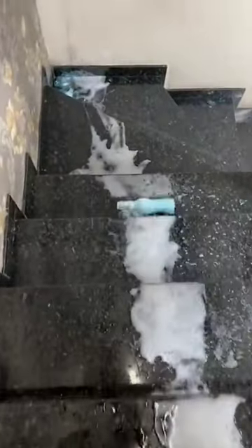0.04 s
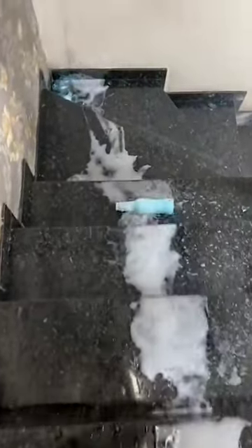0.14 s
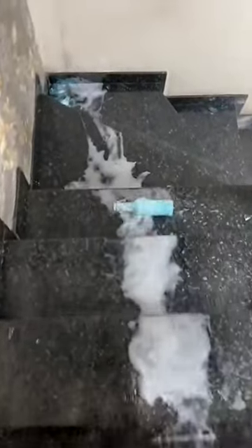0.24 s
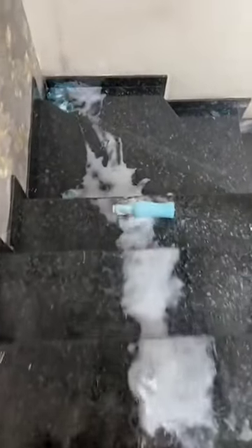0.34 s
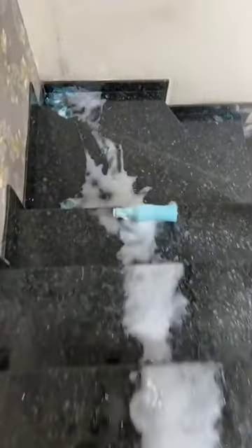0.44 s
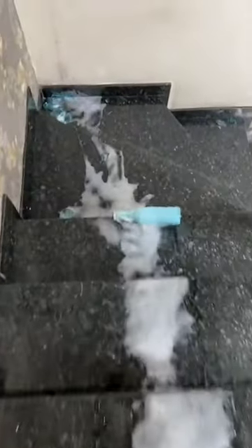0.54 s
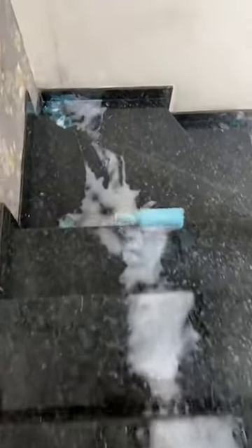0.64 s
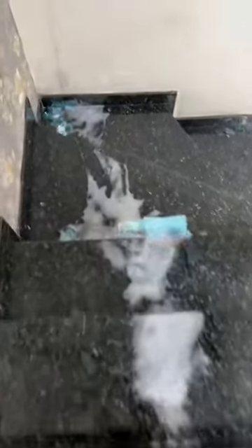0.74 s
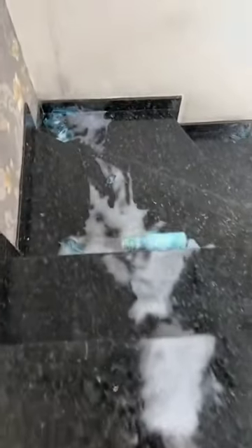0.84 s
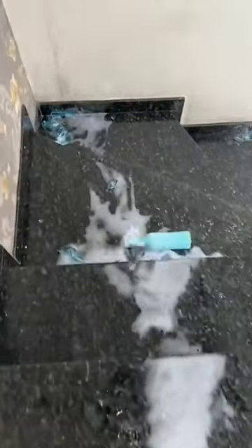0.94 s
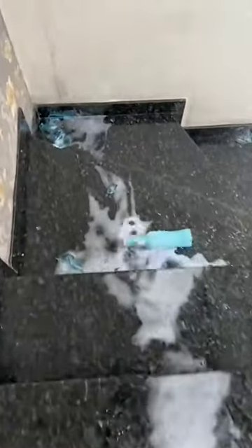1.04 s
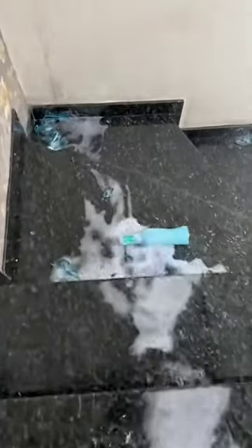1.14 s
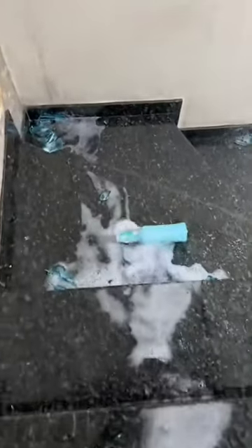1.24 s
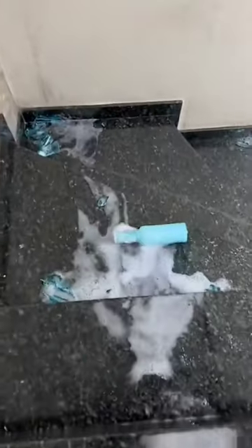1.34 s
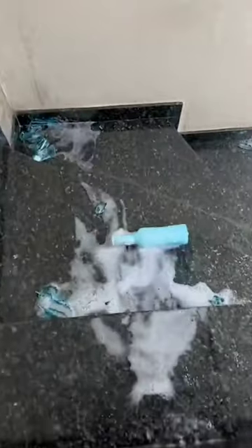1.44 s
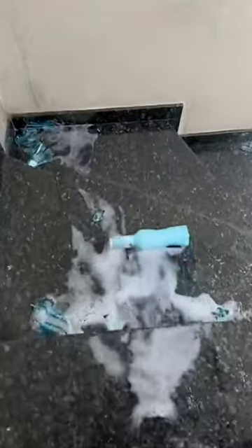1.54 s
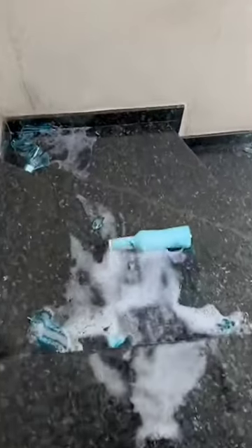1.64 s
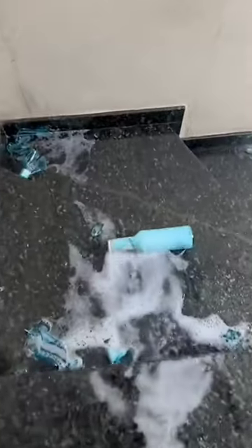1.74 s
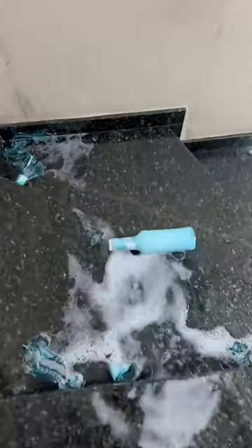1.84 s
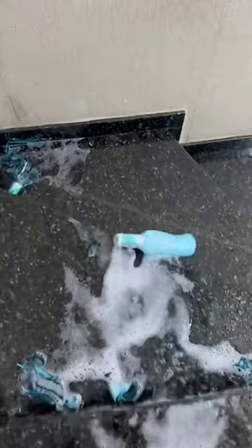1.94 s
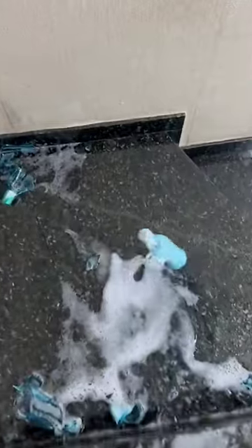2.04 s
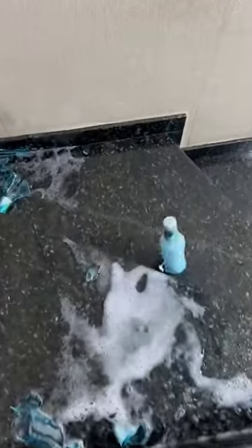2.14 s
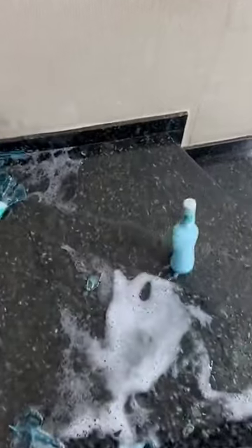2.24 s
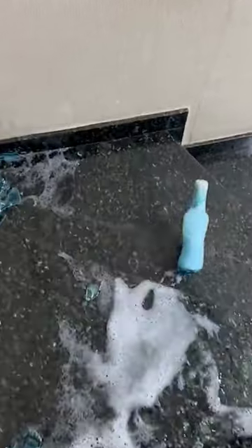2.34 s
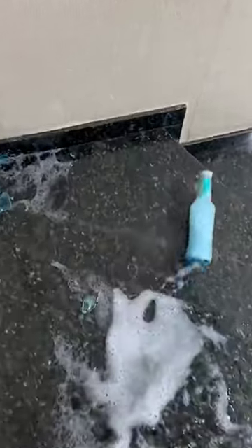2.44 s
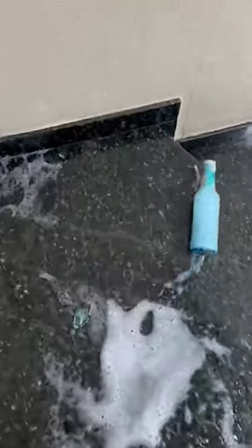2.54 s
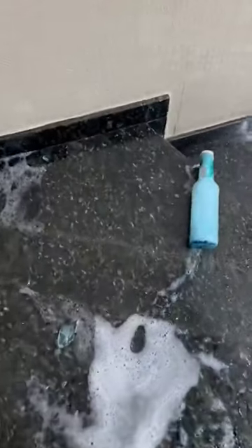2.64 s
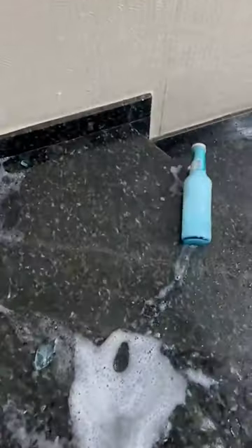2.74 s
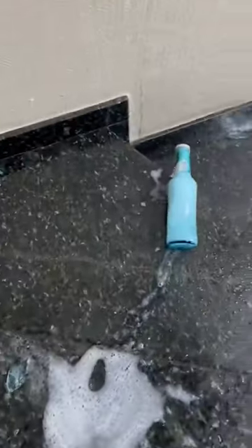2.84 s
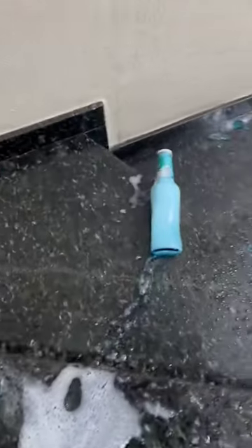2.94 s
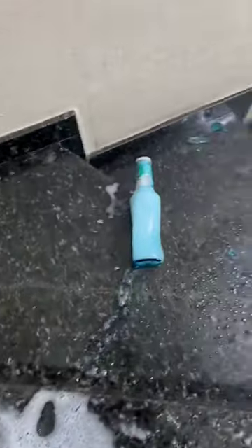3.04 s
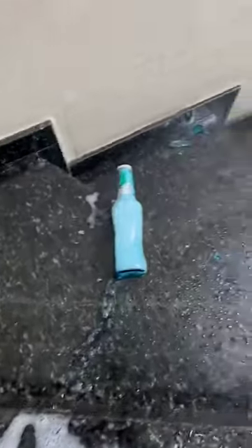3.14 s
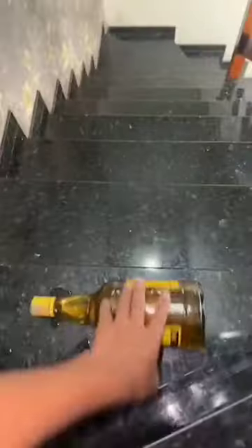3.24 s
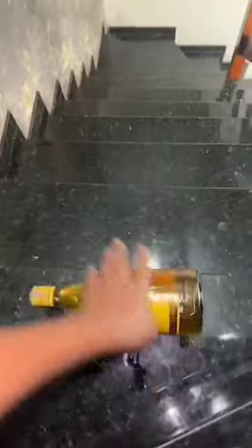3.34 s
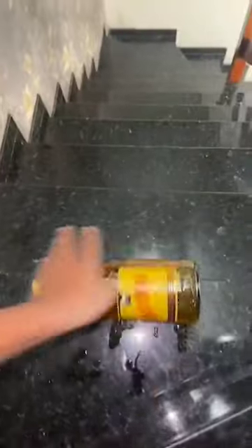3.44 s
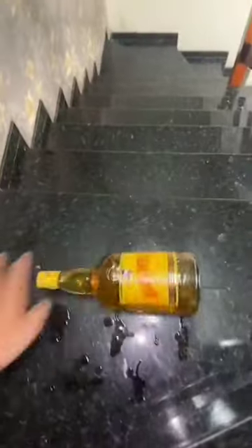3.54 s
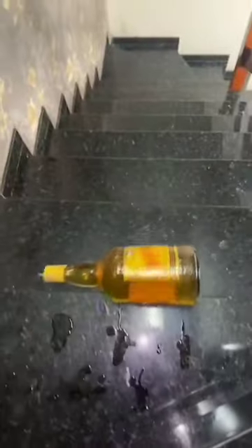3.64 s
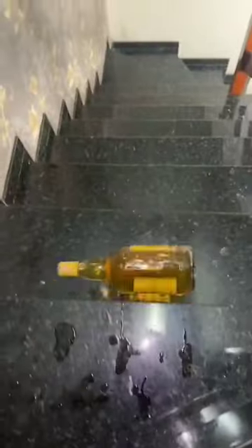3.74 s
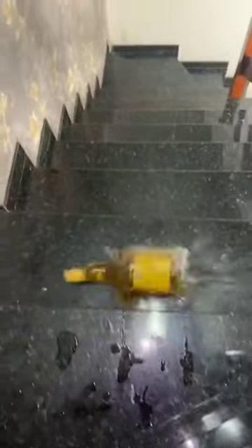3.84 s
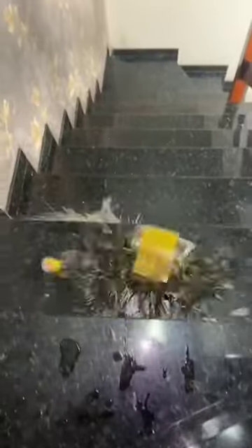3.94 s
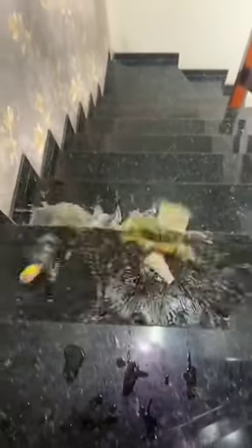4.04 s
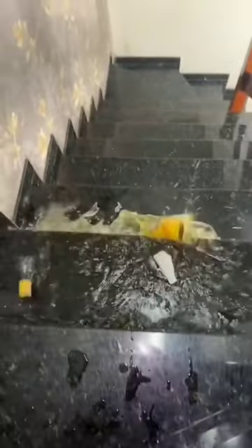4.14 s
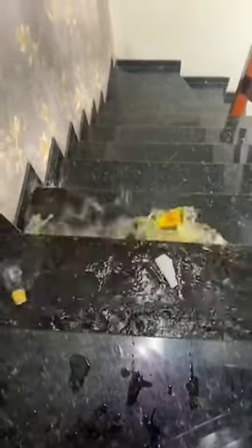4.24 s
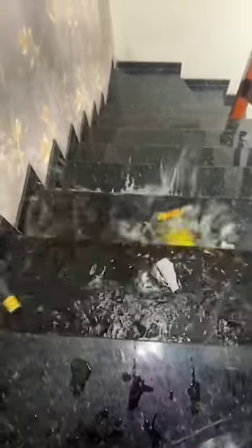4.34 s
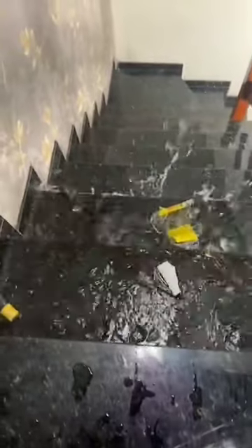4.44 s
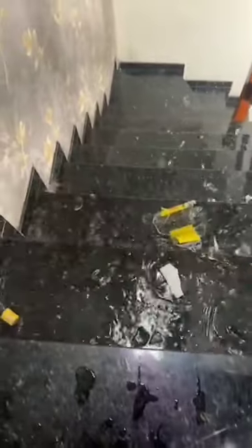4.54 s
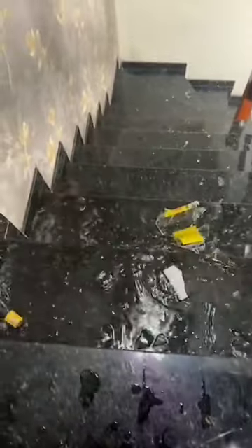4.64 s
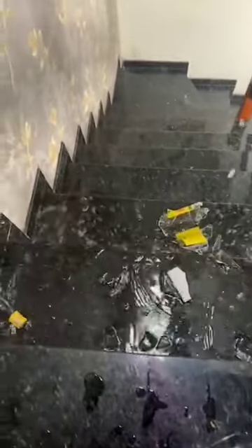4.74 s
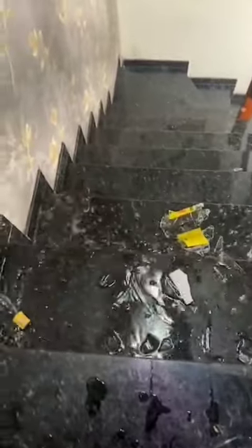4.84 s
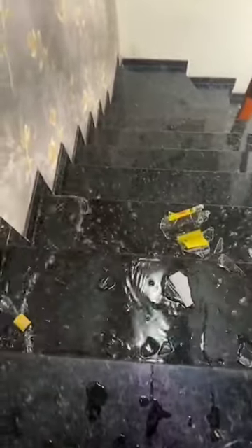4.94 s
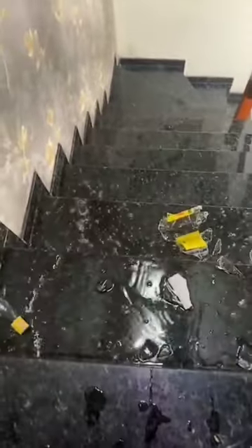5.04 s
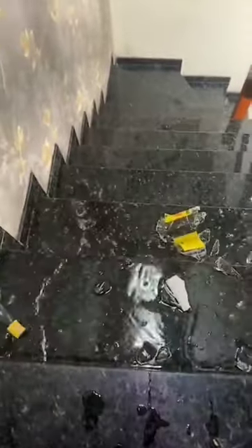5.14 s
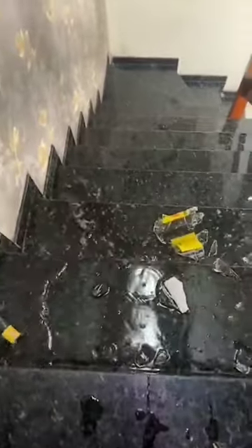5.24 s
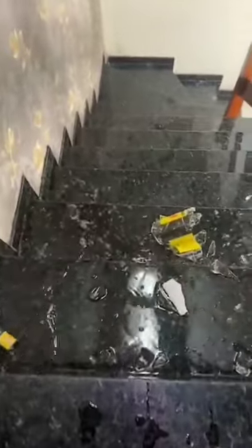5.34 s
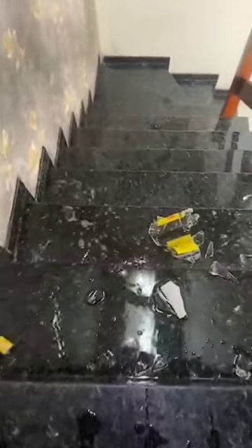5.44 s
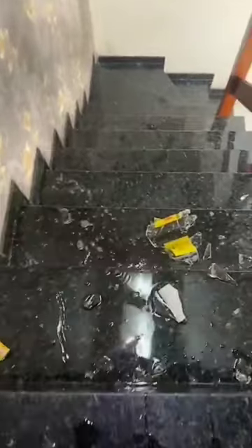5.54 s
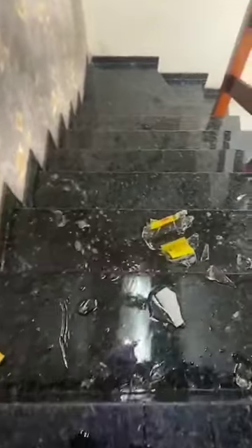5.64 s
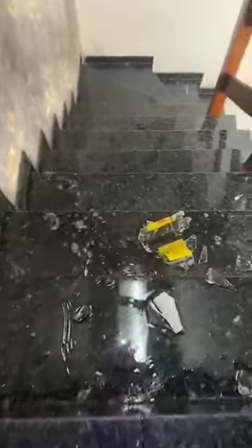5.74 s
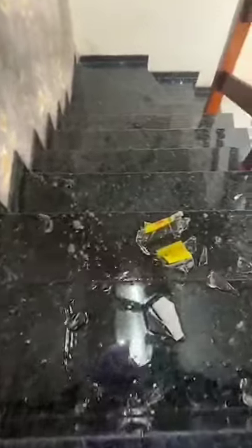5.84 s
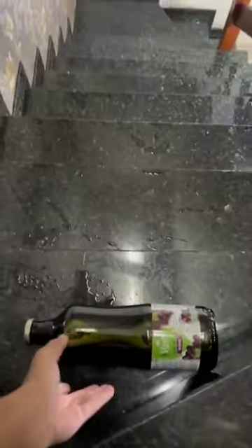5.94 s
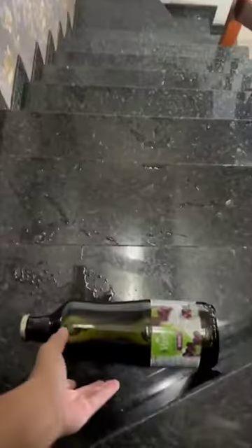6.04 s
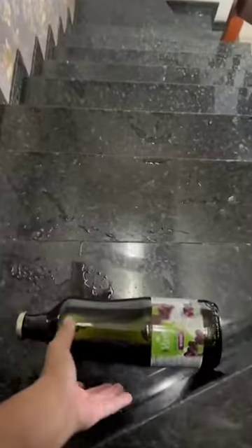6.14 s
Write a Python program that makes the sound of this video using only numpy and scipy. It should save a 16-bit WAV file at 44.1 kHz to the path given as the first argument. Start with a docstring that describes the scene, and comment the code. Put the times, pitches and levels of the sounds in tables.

```python
"""Bottles down a stairwell

Place: granite steps in a hard, echoing stairwell. Microphone: a phone above the bottles, in stereo.
A small full bottle knocks from step to step unbroken: short clacks, damped wall modes and thuds.
A big one is set down, rolls off the edge and bursts: ringing modes, showers of clicks, filtered spatter.
A third bottle starts to roll: uneven low noise with dull bumps. Shaped noise gives the echo and the air.
"""
import sys
import numpy as np
from scipy import signal
from scipy.fft import rfft, irfft
from scipy.io import wavfile
from scipy.ndimage import uniform_filter1d, minimum_filter1d

SR = 44100
rng = np.random.default_rng(int(sys.argv[2]) if len(sys.argv) > 2 else 0)


def dump(signal):
    """Clip the signal to [-1, 1] and save it as 16-bit WAV at the path in sys.argv[1]."""
    limited = np.clip(np.atleast_2d(signal).T, -1, 1)
    pcm = np.round(limited * 32767).astype(np.int16)
    wavfile.write(sys.argv[1], SR, pcm)


N = 272979
TIME = np.arange(N) / SR  # the whole take, s
HIT_TIME = np.arange(SR * 3 // 5) / SR  # one hit, s

# All event and mode levels are relative; scene() sets the balance between the sources. # background air, which
# shifts abruptly at these times: [from t/s, level/dB, side level/dB, high edge f/Hz]
PLACES = [(0, -59.5, -71, 14000), (2.3, -63, -71, 10000), (3.22, -63.5, -100, 6000),
          (5.96, -61.5, -65.5, 16000)]
# colour of the air in the middle, and at the sides: [f/Hz, level/dB]
AIR_COLOUR = [(25, -11.5), (60, 9), (100, -2.5), (200, -5.5), (500, -11), (1000, -9), (2000, -11.5),
              (4000, -10), (8000, -11.5), (10000, -11.5), (11500, -41.5), (16000, -50.5)]
AIR_SIDE_COLOUR = [(100, -23), (450, 3), (1000, -3), (1800, -10), (3000, -2), (6000, -2.5), (10000, -6.5),
                   (12000, -29)]
# how long the stairwell echoes: [f/Hz, t60/s]
STAIRWELL_T60 = [(150, 1.0), (400, 0.89), (1000, 0.63), (2800, 0.53), (7000, 0.48), (14000, 0.39)]
# single early reflections from the walls: [delay t/s, level/dB]
WALL_ECHOES = [(.0072, -15.5), (0.012, -15.5), (0.0239, -13.5)]
# colour of the small bottle's echo at the sides: [f/Hz, side level/dB]
ECHO_WIDTH = [(100, -25.5), (300, -19), (900, -13), (1800, -22.5), (2600, -6), (4500, -4), (7500, -10),
              (12000, -9.5)]
# the echo weakens as the phone catches up with the small bottle: [t/s, echo level/dB]
KNOCK_ECHO = [(0, -2), (2.42, -2.5), (2.57, -8), (3.23, -14)]

# the spilled drink foams: [start t/s, level/dB, attack t/s, hold t/s, fade/(dB per s)]
FOAM_FADE = (4.6, -67.5, 0.1, 0.7, 35)
# colour of the foam: [f/Hz, level/dB]
FOAM_COLOUR = [(1000, -20), (4000, -6), (10000, 1), (15500, -2)]
# a palm slides off the glass: [start t/s, level/dB, attack t/s, hold t/s, fade/(dB per s)]
HAND_FADE = (3.5, -48.5, 0.02, 0.01, 136)
# colour of skin on glass: [f/Hz, level/dB]
HAND_COLOUR = [(300, -25), (2000, -4), (5000, 1.5), (9000, -4.5), (15000, -7)]
# the big and the third bottle roll: [start t/s, level/dB, attack t/s, hold t/s, fade/(dB per s)]
BIG_ROLL_FADE = (3.5, -43, 0.045, 0.33, 72)
THIRD_ROLL_FADE = (5.96, -42.5, 0.004, -0.1, 23)
# colour of each roll: [f/Hz, level/dB]
BIG_ROLL_COLOUR = [(40, -14.5), (85, 6), (150, -14.5), (340, 7.5), (900, -1.5), (1400, -14.5),
                   (2100, -10.5), (3400, -25), (5000, -18), (7000, -38), (16000, -32.5)]
THIRD_ROLL_COLOUR = [(30, -11), (75, -2), (120, -2), (175, -44), (225, -4), (255, 5), (290, -10),
                     (360, -14), (700, -24.5), (3000, -26.5), (6500, -44.5), (9500, -31), (12500, -49)]
# the third bottle bumps on its seam as it rolls: [t/s, level/dB]
ROLL_BUMPS = [(5.969, -27), (6.009, -27), (6.085, -21), (6.156, -23)]
# modes of one bump: [f/Hz, level/dB, t60/s]
BUMP_MODES = [(74.5, 1, 0.091), (115, -3, .08), (240.5, 3, 0.13), (285, 0.5, 0.091)]

# the freed drink slaps down over trapped air, modes: [f/Hz, level/dB, t60/s]
AIR_POCKET = [(190, -4.5, .16), (223.6, -6, 0.4)]
# the drink lands, as a mass (low) or as fine drops (high): [t/s, level/dB, decay t/s, pitch f/Hz]
SPLASHES = [(3.819, -7.5, 0.082, 378), (4.183, -20, 0.013, 10000), (4.203, -16, 0.012, 10100),
            (4.285, -6, 0.027, 9000), (4.305, -8.5, 0.043, 822), (4.582, -16.5, 0.044, 7400),
            (4.68, -21.5, 0.082, 5400), (4.996, -23.5, 0.055, 5000), (5.06, -21, 0.033, 9200),
            (5.145, -30, 0.053, 7400), (5.205, -34, 0.03, 2600), (5.538, -17, 0.025, 7600)]
# showers of splinters: [t/s, level/dB, decay t/s]
SHOWERS = [(3.822, 6.5, 0.034), (3.872, -0.5, 0.05), (3.96, 1.5, 0.086), (4.219, -4, 0.15),
           (4.289, 2, 0.044), (4.39, -9.5, 0.035), (4.9, -36, 0.018), (5.42, -43, 0.04),
           (5.527, -23.5, 0.06), (5.768, -34, 0.031)]
# colour of breaking glass: [f/Hz, level/dB]
BREAKING_COLOUR = [(60, -11), (300, -1.5), (800, 5), (1700, 2), (2600, -1.5), (3600, 0), (6000, 0),
                   (7000, -9), (10000, -6), (12500, -9), (16000, -6)]
# the big bottle cracks, and its remains hit the next step: [t/s, level/dB]
CRACKS = [(3.809, 4.5), (3.957, -7), (4.299, 0.5), (4.326, -2.5)]

# the big bottle is set down and tips over its seam: [t/s, level/dB, high edge f/Hz]
BIG_BLOWS = [(3.247, -27, 6000), (3.257, -17, 5500), (3.344, -28, 3000), (3.500, -20.5, 2100),
             (3.562, -28, 1000)]
# landings of the body, neck and base pieces, and late light blows on the body piece again: [t/s, level/dB]
BODY_BLOWS = [(3.945, -7.5), (3.957, -5), (3.995, -7)]
NECK_BLOWS = [(4.185, -11), (4.206, -11), (4.232, -22.5)]
BASE_BLOWS = [(4.294, -6), (4.322, -2.5), (4.383, -9), (4.557, -24.5)]
LATE_BODY_BLOWS = [(5.535, -30), (5.781, -45)]
# modes of the ringing glass, whole and in pieces: [f/Hz, level/dB, t60/s]
BIG_BOTTLE = [(293.6, -5.5, 0.25), (350, -4, 0.079), (471, -6, .1), (605.7, -1.5, 0.16), (810, -4, 0.051),
              (927, -1.5, .1), (1110, -13.5, 0.073), (1833, -1.5, 0.055), (2060, -5, .25),
              (2492, -9.5, 0.076), (2585, -9, .08), (2736, -5, .1), (4550, -3.5, .15)]
BODY_PIECE = [(1071.4, 3, 0.19), (1058, 5.5, 0.37), (1176, -3, 0.33), (2056, -11.5, 0.35), (2094, 0, 0.13),
              (2650, -14, 0.27), (3867, 1.5, 0.12), (4651, -6, 0.33), (4800, -15, .3), (5640, -11.5, 0.27),
              (5580, -10, 0.43), (6360, -9, 0.86)]
NECK_PIECE = [(4670, 3, 0.05), (5000, -15, 0.11), (9480, -5.5, 0.085), (9964, -8.5, 0.13)]
BASE_PIECE = [(649, -4.5, 0.073), (710, -9, 0.13), (744, -2.5, 0.074), (776, 1, 0.25), (886, 1.5, 0.056),
              (1376, -18, 0.13), (1737, -5, 0.19), (1940, -4.5, .12), (3870, -10, .25), (4700, -11.5, .25)]
BODY_PIECE_LATE = [(3920, 0, 0.35), (4377, -7, 0.28), (4740, -5, 0.4), (5997, -2, 0.3), (6406, -5, 0.45)]
SLIVER = [(7150, -2.5, .05), (7240, 1, 0.067), (8000, -6, 0.035), (7800, 1, .05), (8050, -5, 0.056),
          (8150, -1, .04)]

# the small bottle hits stone: [t/s, level/dB, pitch of the struck spot f/Hz, glass ring level/dB]
KNOCKS = [(0.0012, -1.5, 1750, -1.5), (0.003, -6, 4000, -6), (0.013, -14, 950, -6), (0.1225, -14, 1600, -5),
          (0.148, -12.5, 2130, -2), (0.19, -24.5, 2070, -8), (0.693, -33, 380, -4), (0.842, -4.5, 1644, 3),
          (0.854, -4.5, 2000, -1), (0.857, -2.5, 3200, 1), (0.866, -12, 3300, 0), (0.872, -16.5, 720, -5.5),
          (0.958, -11.5, 1930, 1.5), (0.976, -12, 1750, -1), (1.032, -18, 1900, 4), (1.326, -37, 470, -5),
          (1.881, -32.5, 480, -10), (1.995, -47, 260, -10), (2.0871, -4, 1080, 1), (2.0893, -7.5, 1700, 8),
          (2.187, -13, 1080, 5.5), (2.229, -20.5, 950, 6), (2.4199, -2, 1900, 4), (2.471, -16.5, 3750, 2),
          (2.5671, -1.5, 2540, 5), (2.579, -14.5, 2700, 1.5), (2.643, -8.5, 1900, -0.5),
          (2.680, -17, 1680, 0), (3.065, -45.5, 1300, 0.5), (3.149, -31, 2005, -1), (3.234, -29, 1600, -7)]
# the dead clack of full glass on stone: [f/Hz, level/dB]
CLACK_COLOUR = [(40, -33.5), (120, -16.5), (250, -0.5), (420, -3.5), (900, -2), (1800, -1.5), (2700, 0),
                (3900, -5.5), (4500, -4), (5600, -16.5), (7400, -8.5), (9500, -9), (11200, -29),
                (16000, -37)]
# modes of the small bottle's wall: [f/Hz, level/dB, t60/s]
SMALL_BOTTLE = [(984, -11.5, 0.17), (1724, -13.5, 0.012), (2310, -10.5, 0.016), (2960, -13, .025),
                (3266, -2.5, 0.03), (3387, -6.5, 0.18), (4270, -12.5, 0.048), (7350, -11, .015),
                (9050, -9.5, .012)]

# a splash rises for a share of its decay time; its band spans this ratio either side of the pitch
SPLASH_RISE_SHARE, DROP_SIZE_RATIO = 0.21, 1.52
# a shower rises for a share of its decay time; a louder one reaches higher
SHOWER_RISE_SHARE, SHOWER_LOW_HZ, SHOWER_TOP_HZ, SHOWER_DB_PER_OCTAVE = 0.2, 1015, 7600, 33
CRACK_LOW_HZ, CRACK_TOP_HZ = 660, 7600
SHOULDER_LAG_S, SHOULDER_DB = 0.008, -1  # the big bottle's base touches first, then its shoulder
BODY_TOP_HZ, NECK_TOP_HZ, BASE_TOP_HZ, LATE_BODY_TOP_HZ, SLIVER_TOP_HZ = 9500, 11000, 4800, 9000, 12000
# a sliver skitters to rest, each hop shorter and weaker
SLIVER_S, SLIVER_DB, HOP_S, HOP_RATIO, HOP_LOSS_DB = 4.432, -21.5, 0.018, 0.9, 1.1
# a knock's band follows the struck spot, and harder blows reach higher
MID_SPOT_HZ, KNOCK_LOW_HZ, KNOCK_TOP_HZ = 1900, 819, 7900
LOW_PER_PITCH, TOP_PER_PITCH = 1.23, 0.56  # octaves per octave of pitch
KNOCK_DB_PER_OCTAVE = 35  # dB of blow per octave of reach
THUD_HZ, THUD_DB, THUD_RISE_S, THUD_DECAY_S = 182, -31.5, 0.0025, 0.0047
TOP_HZ = 15700  # the finished sound is cut above this


def amp(db):
    """Decibels to gain."""
    return 10 ** (np.asarray(db) / 20)


def unit(x):
    """Scale to unit energy."""
    return x / np.sqrt(np.sum(x ** 2) + 1e-18)


def add(track, s, x):
    """Mix x into the track from time s on."""
    start = max(int(s * SR), 0)
    track[start:start + len(x)] += x[:N - start]


def on_log_hz(hz, points):
    """Read (f/Hz, value) points along a log-frequency axis."""
    f, value = np.transpose(points)
    return np.interp(np.log(hz + 1), np.log(f), value)


def colour(x, points, size=4096):
    """Causal (minimum-phase) filter with the given (f/Hz, level/dB) shape."""
    hz = np.arange(size // 2 + 1) * SR / size
    cepstrum = irfft(np.log(amp(on_log_hz(hz, points))))
    # folding the cepstrum onto positive time makes the filter causal
    cepstrum[1:size // 2] *= 2
    cepstrum[size // 2 + 1:] = 0
    response = irfft(np.exp(rfft(cepstrum)))
    return signal.fftconvolve(x, response)[:len(x)]


def edge(x, hz, kind):
    """Two-pole low-pass or high-pass."""
    b, a = signal.butter(2, min(hz, SR / 2 - 1000), kind, fs=SR)
    return signal.lfilter(b, a, x)


def band(x, low_hz, high_hz):
    """Keep what lies between two soft edges."""
    return edge(edge(x, low_hz, "high"), high_hz, "low")


def swell(rise, decay):
    """Envelope that builds up and dies away; both times in s."""
    return np.minimum(HIT_TIME / rise, 1) * np.exp(-np.maximum(HIT_TIME - rise, 0) / decay)


def fade(start, db, attack, hold, db_per_s):
    """Gain that rises, holds and then falls steadily; a negative hold starts the fall early."""
    age = TIME - start
    fall_db = db_per_s * np.maximum(age - attack - hold, 0)
    return np.clip(age / attack, 0, 1) * amp(db - fall_db)


def murmur(shape, gain, flutter_db, flutter_rate=40):
    """Coloured noise under a gain envelope, made uneven by random bumps, flutter_rate per second."""
    uneven = np.interp(TIME * flutter_rate, np.arange(N), rng.standard_normal(N))
    x = colour(rng.standard_normal(N) * amp(flutter_db * uneven), shape)
    return x / np.std(x) * gain


def specks(rate, spread_db):
    """Random clicks of very unequal size, rate per second on average."""
    chance, sign = rng.random((2, len(HIT_TIME)))
    size = amp(spread_db * np.minimum(rng.exponential(size=len(HIT_TIME)), 4))
    return (chance < rate / SR) * np.sign(sign - .5) * size


def ring(modes, detune=0.0051):
    """Decaying modes; each blow shifts their pitches slightly and flips their signs at random."""
    out = 0
    for (hz, db, t60), (shift, sign) in zip(modes, rng.standard_normal((len(modes), 2))):
        tone = np.sin(2 * np.pi * hz * (1 + detune * shift) * HIT_TIME)
        wave = tone * np.exp(-np.log(1000) * HIT_TIME / t60)
        out = out + np.sign(sign) * amp(db) * unit(wave)
    return unit(out)


def contact(crush_s, grit):
    """One sharp push, then a moment of grit crushed under the glass."""
    push = grit * unit(rng.standard_normal(len(HIT_TIME)) * np.exp(-HIT_TIME / crush_s))
    push[0] += 1
    return push


def strike(modes, high_hz, tick_db=-9):
    """One blow on glass: a gritty tick and the ring of its modes."""
    tick = unit(band(contact(crush_s=0.0056, grit=2.3), modes[0][0], modes[-1][0]))
    return unit(edge(ring(modes, detune=0.0089) + amp(tick_db) * tick, high_hz, "low"))


def air():
    """Faint coloured noise of the stairwell, nearly steady between its abrupt changes. Returns mid and side."""
    mid, side = np.zeros((2, N))
    for s, db, side_db, high_hz in PLACES:
        here = TIME >= s
        here_mid = edge(murmur(AIR_COLOUR, amp(db), flutter_db=1.0), high_hz, "low")
        here_side = murmur(AIR_SIDE_COLOUR, amp(side_db), flutter_db=1.0)
        mid = np.where(here, here_mid, mid)
        side = np.where(here, here_side, side)
    return mid, side


def stairwell(early_db=1, early_s=0.022, build_s=0.0065, size=49152):
    """Echo of bare walls: an early cluster from the flight, then a tail in which the lows stay longest."""
    t = np.arange(size) / SR
    hz = np.fft.rfftfreq(size, 1 / SR)
    spectrum = rfft(rng.standard_normal(size))
    centres, t60s = np.transpose(STAIRWELL_T60)
    tail = 0
    # each row of the identity picks one band, which crossfades into its neighbours
    for t60, share in zip(t60s, np.eye(len(centres))):
        noise = irfft(spectrum * on_log_hz(hz, np.c_[centres, share]))
        tail = tail + noise * np.exp(-np.log(1000) * t / t60)
    early = 1 + amp(early_db) * np.exp(-t / early_s)
    build = 1 - np.exp(-t / build_s)
    return unit(tail * early * build)


def foam():
    """The spilled drink foams: a faint, uneven high hiss."""
    return murmur(FOAM_COLOUR, fade(*FOAM_FADE), flutter_db=2.5)


def hand_slide():
    """Skin rubs on glass as the palm lets go: a brief uneven hiss."""
    return murmur(HAND_COLOUR, fade(*HAND_FADE), flutter_db=4.0)


def big_roll():
    """The big bottle rolls over stone: low, strongly uneven noise."""
    return murmur(BIG_ROLL_COLOUR, fade(*BIG_ROLL_FADE), flutter_db=4.5)


def third_roll():
    """The third bottle starts to roll: low, slightly uneven noise."""
    return murmur(THIRD_ROLL_COLOUR, fade(*THIRD_ROLL_FADE), flutter_db=2.0)


def roll_bumps():
    """Dull knocks of a full, rolling bottle: low modes that soon die away."""
    out = np.zeros(N)
    for s, db in ROLL_BUMPS:
        add(out, s, amp(db) * ring(BUMP_MODES, detune=0.022))
    return out


def whump(s=3.818, db=-12, rise_s=0.01):
    """Air caught under the collapsing drink gives a short hollow note."""
    out = np.zeros(N)
    add(out, s, amp(db) * ring(AIR_POCKET) * np.minimum(HIT_TIME / rise_s, 1))
    return out


def splashes():
    """The drink slaps the stone and rains on the steps: random clicks and noise banded round a pitch."""
    out = np.zeros(N)
    for s, db, decay, pitch_hz in SPLASHES:
        shape = swell(SPLASH_RISE_SHARE * decay, decay)
        low_hz, high_hz = pitch_hz / DROP_SIZE_RATIO, pitch_hz * DROP_SIZE_RATIO
        drops = shape * specks(rate=4000, spread_db=3.5)
        film = shape * rng.standard_normal(len(HIT_TIME))  # the sheet of liquid spreading out
        splash = unit(band(drops, low_hz, high_hz)) + amp(-7) * unit(band(film, low_hz / 4, high_hz))
        add(out, s, amp(db) * unit(edge(splash, 120, "high")))
    return out


def splinters(count=40, t60=0.039, tinkle_db=-1.5):
    """Dense ticks of breaking glass; random clicks also ring each splinter at its own pitch."""
    out = np.zeros(N)
    for s, db, decay in SHOWERS:
        shape = swell(SHOWER_RISE_SHARE * decay, decay)
        pitches_hz = 900 * 16 ** (rng.random(count) ** .7)  # 900 to 14400 Hz, more of them high
        tinkle = 0
        for hz, life in zip(pitches_hz, rng.uniform(.4, 1.6, count)):
            # a two-pole resonator, whose pole radius sets the decay
            radius = np.exp(-np.log(1000) / (t60 * life * SR))
            angle = 2 * np.pi * hz / SR
            poles = [1, -2 * radius * np.cos(angle), radius ** 2]
            bounces = shape * specks(rate=140, spread_db=3)
            tinkle = tinkle + signal.lfilter([np.sin(angle)], poles, bounces)
        ticks = shape * specks(rate=2000, spread_db=4.5)
        glass = colour(unit(ticks) + amp(tinkle_db) * unit(tinkle), BREAKING_COLOUR)
        high_hz = SHOWER_TOP_HZ * 2 ** (db / SHOWER_DB_PER_OCTAVE)
        add(out, s, amp(db) * unit(band(glass, SHOWER_LOW_HZ, high_hz)))
    return out


def cracks():
    """Fractures run through the glass in a millisecond or two: a click and a burst of noise."""
    out = np.zeros(N)
    for s, db in CRACKS:
        snap = colour(contact(crush_s=0.0012, grit=2.5), BREAKING_COLOUR)
        add(out, s, amp(db) * unit(band(snap, CRACK_LOW_HZ, CRACK_TOP_HZ)))
    return out


def sliver_hops(count=6):
    """Times and levels of a sliver bouncing to rest."""
    hop = np.arange(count)
    gaps = HOP_S * HOP_RATIO ** hop
    return zip(SLIVER_S + np.cumsum(gaps) - gaps, SLIVER_DB - HOP_LOSS_DB * hop)


def ringing_glass():
    """The big bottle, and later its pieces, ring in their own modes at every blow."""
    out = np.zeros(N)
    for s, db, high_hz in BIG_BLOWS:
        add(out, s, amp(db) * strike(BIG_BOTTLE, high_hz))
        add(out, s + SHOULDER_LAG_S, amp(db + SHOULDER_DB) * strike(BIG_BOTTLE, high_hz))
    pieces = (
        (BODY_PIECE, BODY_BLOWS, BODY_TOP_HZ),
        (NECK_PIECE, NECK_BLOWS, NECK_TOP_HZ),
        (BASE_PIECE, BASE_BLOWS, BASE_TOP_HZ),
        (BODY_PIECE_LATE, LATE_BODY_BLOWS, LATE_BODY_TOP_HZ),
        (SLIVER, sliver_hops(), SLIVER_TOP_HZ),
    )
    for modes, blows, high_hz in pieces:
        for s, db in blows:
            add(out, s, amp(db) * strike(modes, high_hz))
    return edge(out, 90, "high")  # the ringing glass carries nothing below about 90 Hz


def small_bottle(clack_s=0.00036, spread_db=-7, tick_db=-20, wall_db=-5.5):
    """Each hit clacks, thuds and rings the drink-damped wall. Returns direct sound, room feed and echo."""
    direct, feed, echo = np.zeros((3, N))
    for s, db, pitch_hz, ring_db in KNOCKS:
        spot = pitch_hz / MID_SPOT_HZ
        low_hz = KNOCK_LOW_HZ * spot ** LOW_PER_PITCH
        high_hz = KNOCK_TOP_HZ * spot ** TOP_PER_PITCH * 2 ** (db / KNOCK_DB_PER_OCTAVE)
        push = contact(crush_s=0.0021, grit=2.17)
        crack = unit(band(colour(push, CLACK_COLOUR), low_hz, high_hz))
        wall = amp(ring_db + wall_db) * band(ring(SMALL_BOTTLE, detune=.012), low_hz / 2, high_hz)
        # the struck spot swings for a few cycles at most, at its own pitch
        swing = HIT_TIME * np.exp(-HIT_TIME / clack_s) * np.sin(2 * np.pi * pitch_hz * HIT_TIME)
        clack = band(unit(swing), low_hz, high_hz)
        # the drink inside thuds too, more at low-pitched spots such as the heavy base
        slosh = np.sin(2 * np.pi * THUD_HZ * HIT_TIME) * swell(THUD_RISE_S, THUD_DECAY_S)
        thud = amp(THUD_DB) / spot ** 2 * unit(slosh)
        # only hard blows are sharp enough to reach the highest treble
        tick = amp(2 * db + tick_db) * unit(edge(push, 9000, "high"))
        add(direct, s, amp(db - 4.5) * (crack + wall + thud + clack + tick))
        # the room hears all sides of the bottle, so the struck spot stands out less there
        echo_db = np.interp(s, *np.transpose(KNOCK_ECHO))
        spread = amp(db + echo_db) * (crack + wall + thud + amp(spread_db) * (clack + tick))
        add(feed, s, spread)
        # every hit is at a new place, with its own pattern of echoes
        add(echo, s, signal.fftconvolve(spread, stairwell()))
    return direct, feed, echo


def scene():
    """The big bottle breaks straight ahead; the small one, down at the bend, echoes from the sides too."""
    air_mid, air_side = air()
    wet = splashes() + whump()
    shower, fracture, glass = splinters(), cracks(), ringing_glass()
    knocks, knock_feed, knock_echo = small_bottle()

    direct = amp(8.0) * roll_bumps() + amp(10.5) * wet + amp(10) * shower
    direct += amp(2.5) * fracture + amp(13) * glass + amp(14.5) * knocks
    feed = amp(10) * wet + amp(6) * shower + amp(10) * fracture + amp(11) * glass

    mid = direct + amp(12) * knock_echo + signal.fftconvolve(feed, stairwell())[:N]
    for delay, db in WALL_ECHOES:
        add(mid, delay, amp(db) * direct)
    mid += air_mid + foam() + hand_slide() + big_roll() + third_roll()

    wide_echo = signal.fftconvolve(knock_feed, stairwell(early_db=-14, build_s=.015))[:N]
    side = amp(12) * colour(wide_echo, ECHO_WIDTH) + air_side
    return np.array([mid + side, mid - side])


def record(dry, ceiling=0.87):
    """The phone's limiter turns the loudest peaks down for a few milliseconds; the top is cut."""
    allowed = ceiling / np.maximum(np.abs(dry).max(axis=0), ceiling)
    gain = uniform_filter1d(minimum_filter1d(allowed, size=131), size=131)  # 131 samples: 3 ms
    lowpass = signal.ellip(10, .2, 80, TOP_HZ, fs=SR, output="sos")
    return signal.sosfilt(lowpass, dry * gain)


dry = scene()
out = record(dry)
dump(out)
```